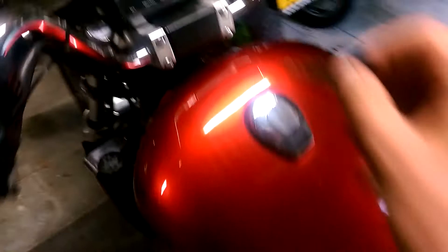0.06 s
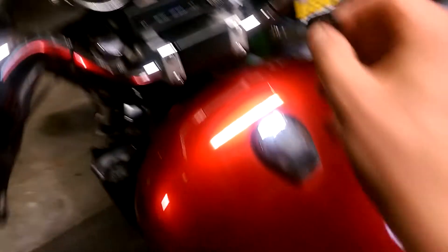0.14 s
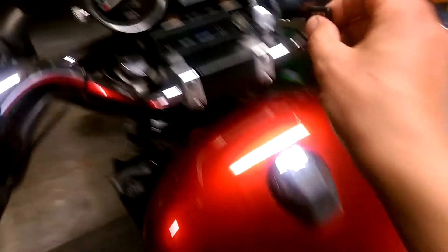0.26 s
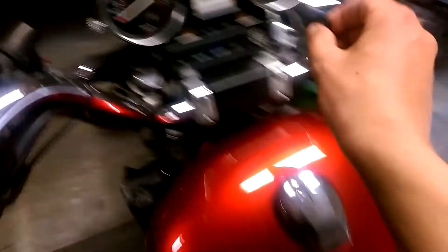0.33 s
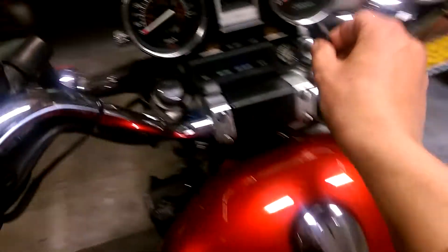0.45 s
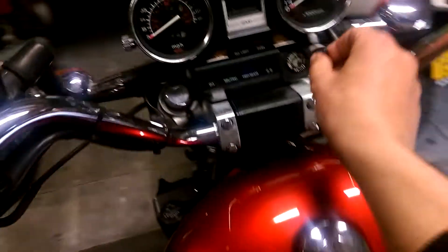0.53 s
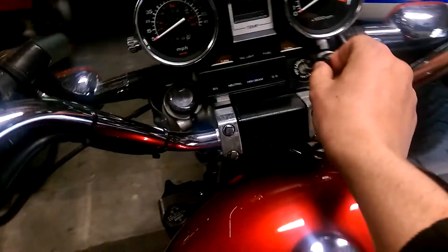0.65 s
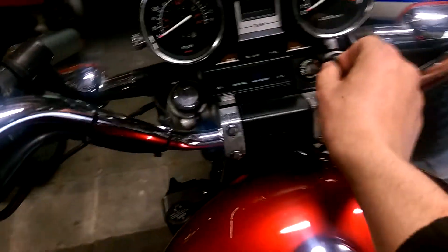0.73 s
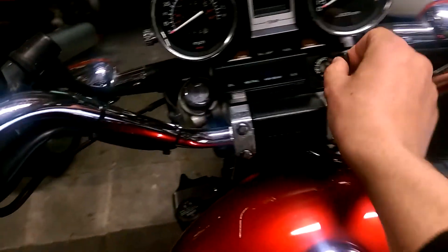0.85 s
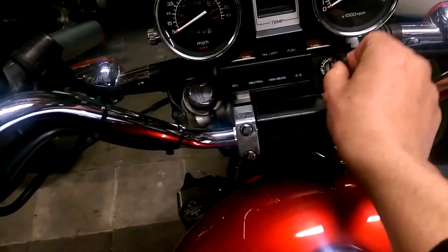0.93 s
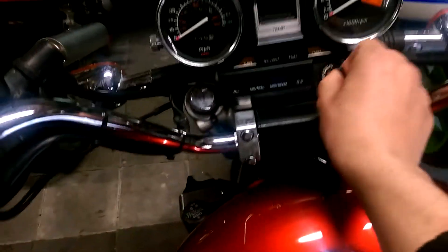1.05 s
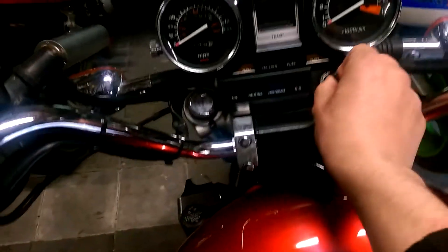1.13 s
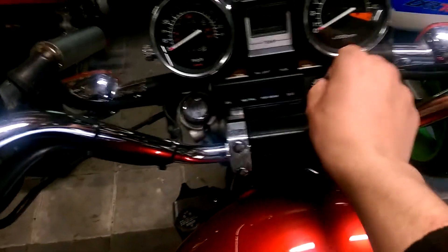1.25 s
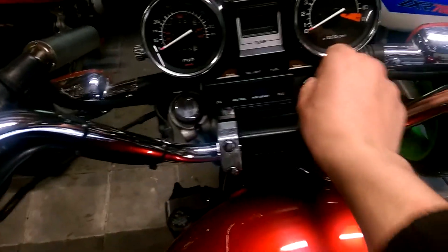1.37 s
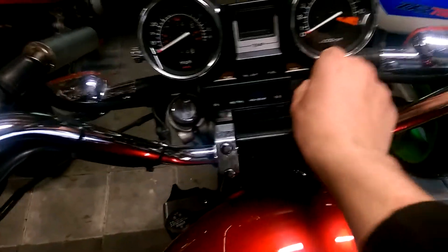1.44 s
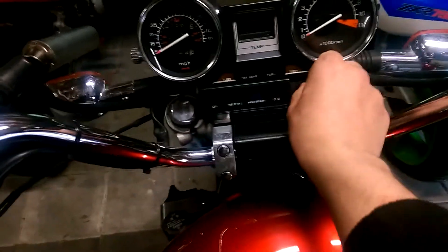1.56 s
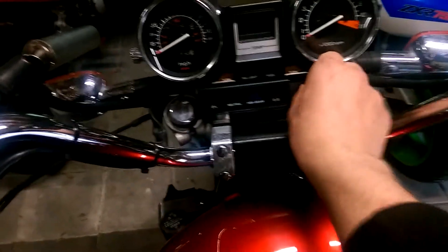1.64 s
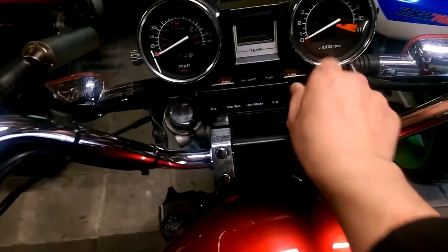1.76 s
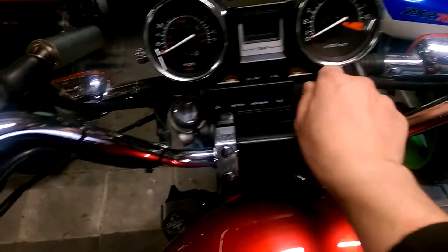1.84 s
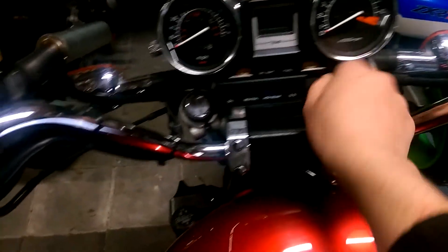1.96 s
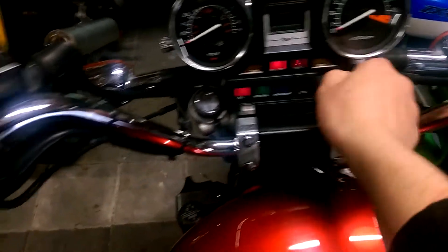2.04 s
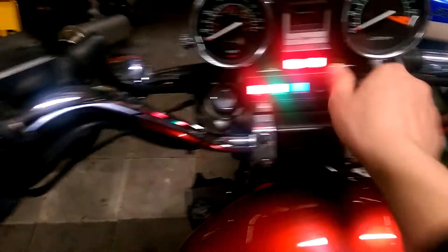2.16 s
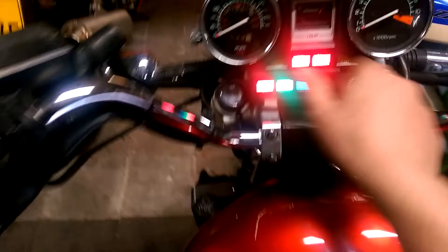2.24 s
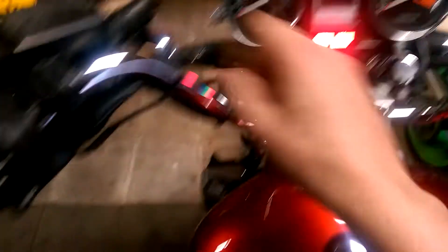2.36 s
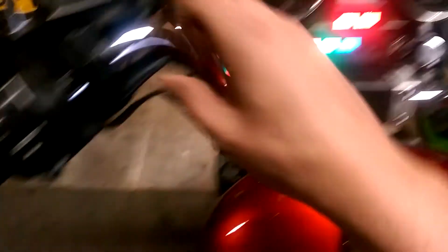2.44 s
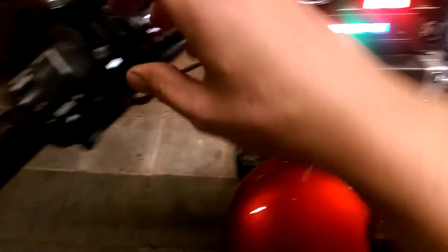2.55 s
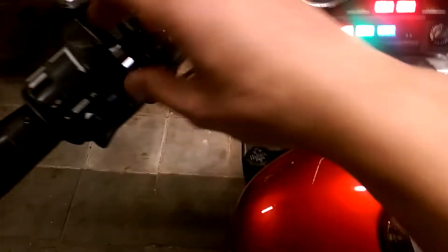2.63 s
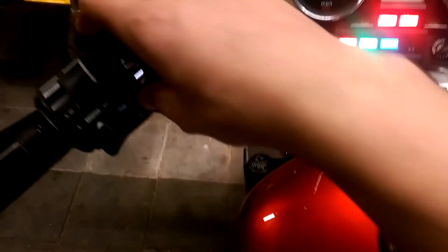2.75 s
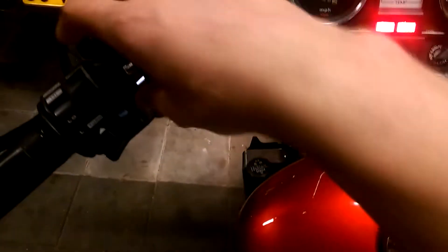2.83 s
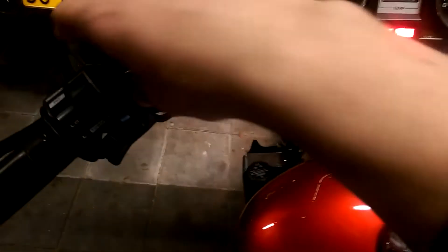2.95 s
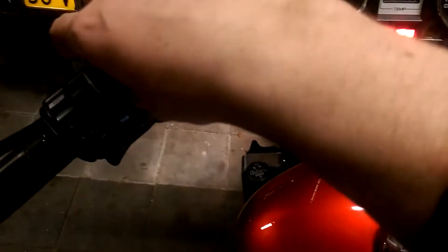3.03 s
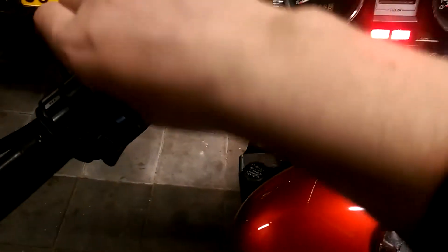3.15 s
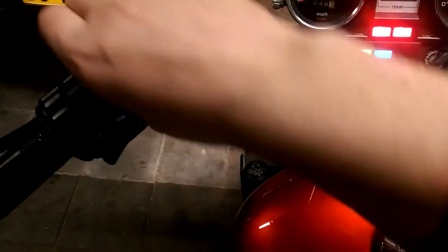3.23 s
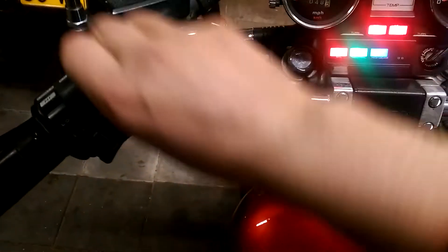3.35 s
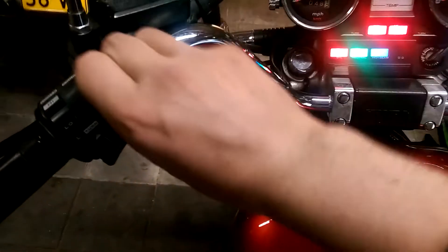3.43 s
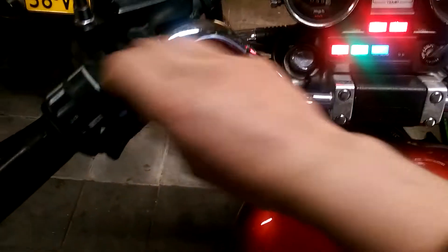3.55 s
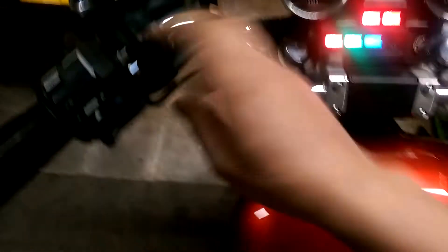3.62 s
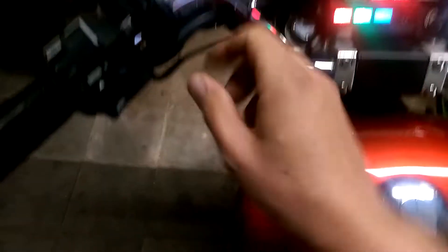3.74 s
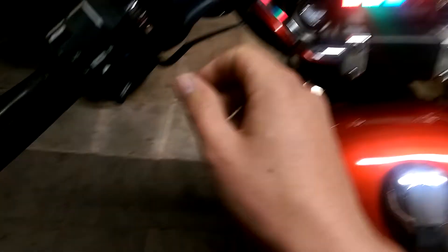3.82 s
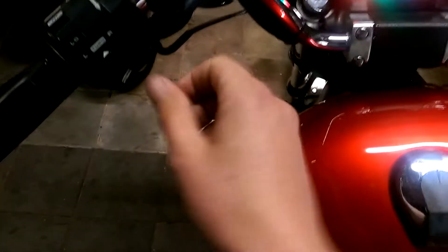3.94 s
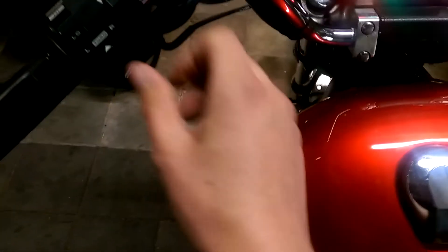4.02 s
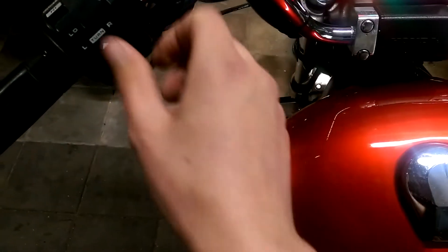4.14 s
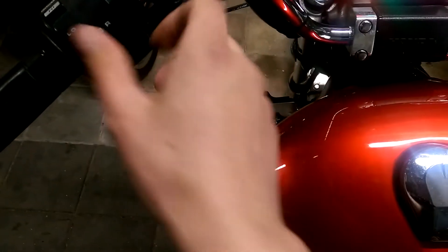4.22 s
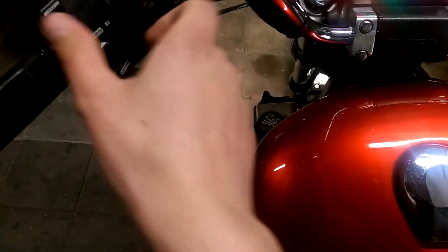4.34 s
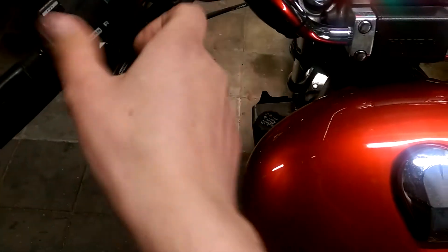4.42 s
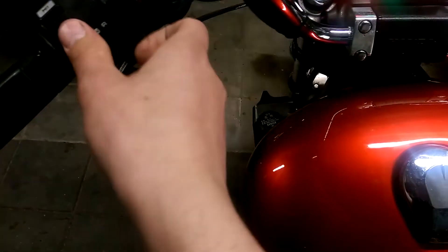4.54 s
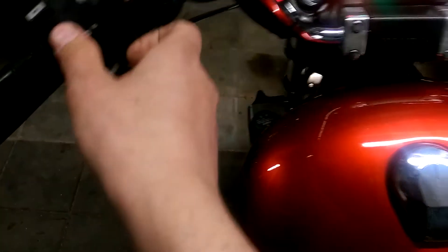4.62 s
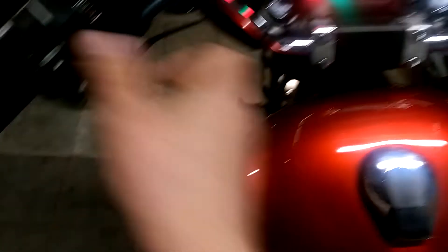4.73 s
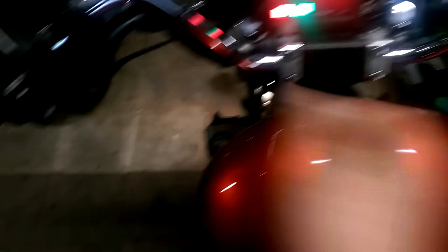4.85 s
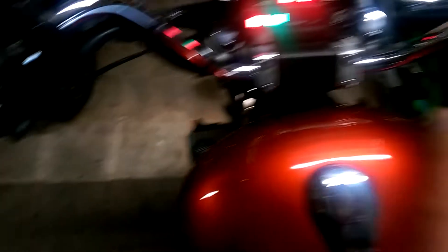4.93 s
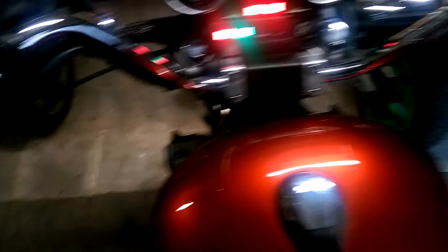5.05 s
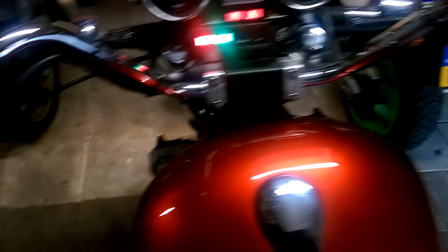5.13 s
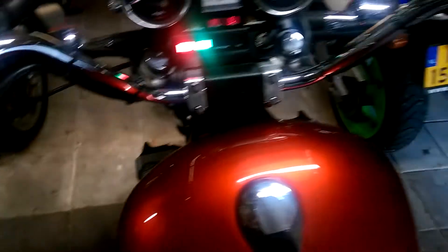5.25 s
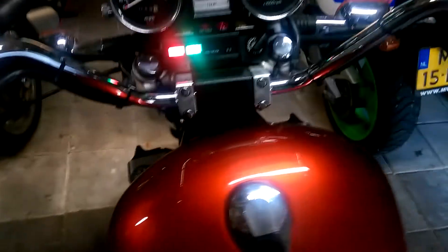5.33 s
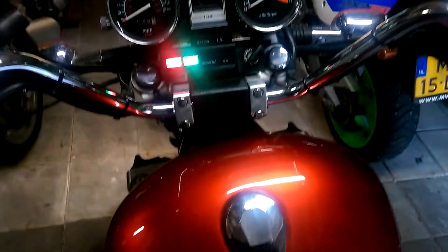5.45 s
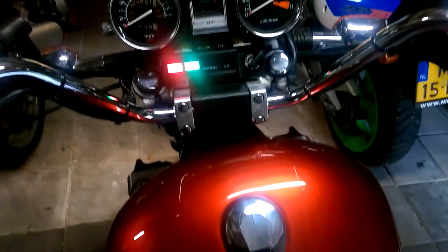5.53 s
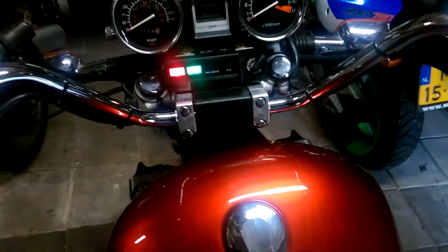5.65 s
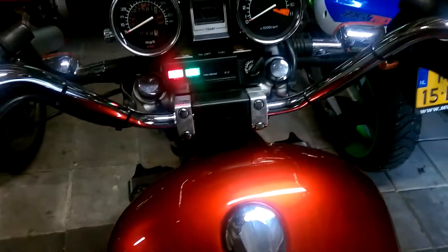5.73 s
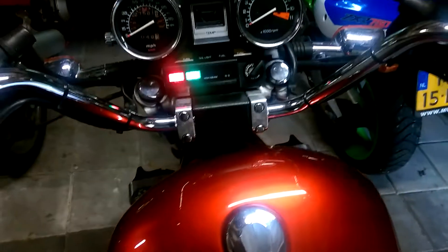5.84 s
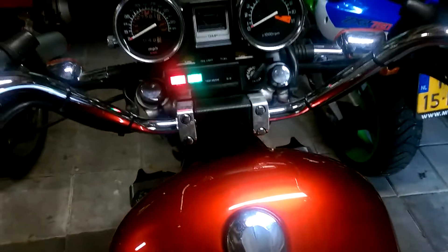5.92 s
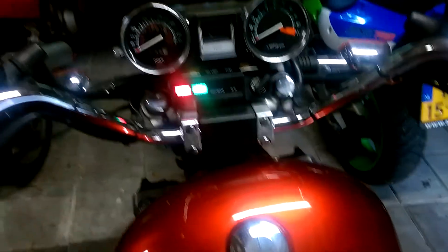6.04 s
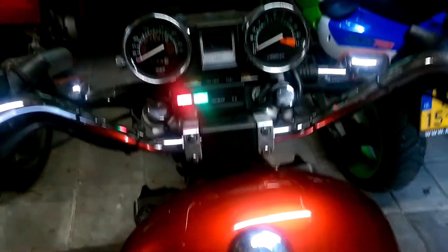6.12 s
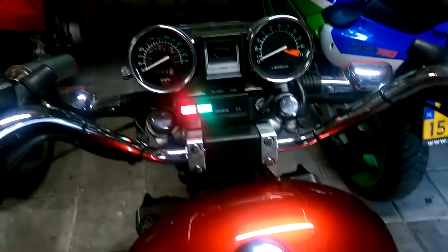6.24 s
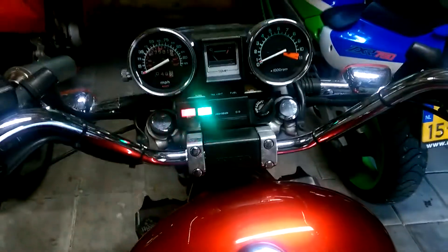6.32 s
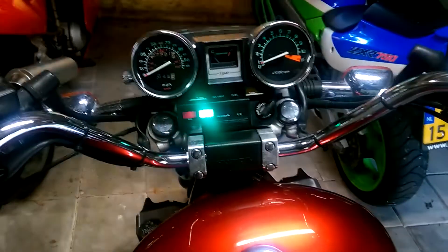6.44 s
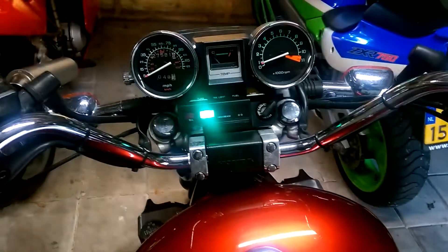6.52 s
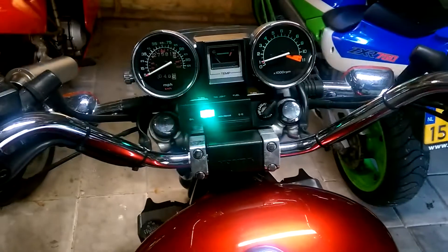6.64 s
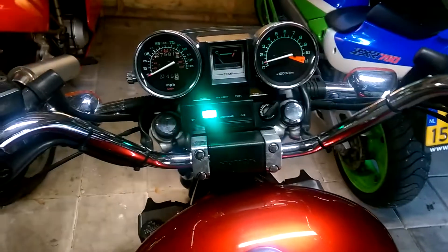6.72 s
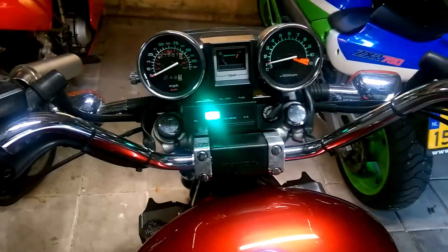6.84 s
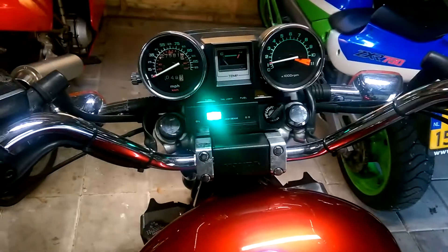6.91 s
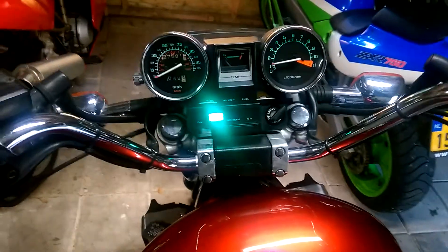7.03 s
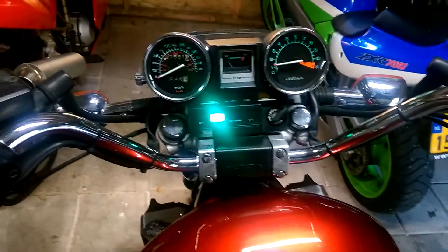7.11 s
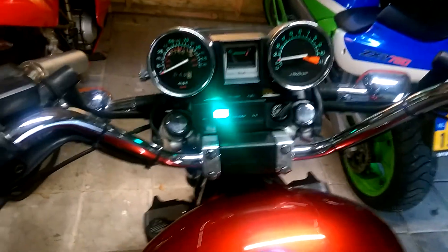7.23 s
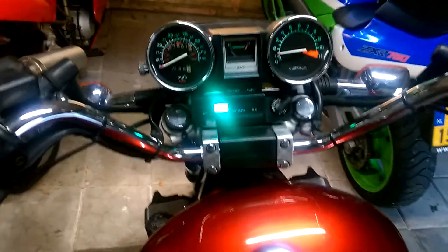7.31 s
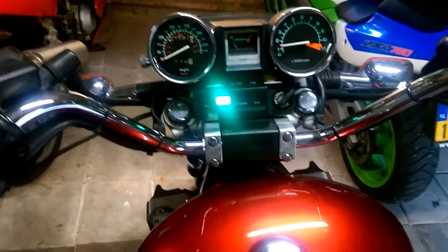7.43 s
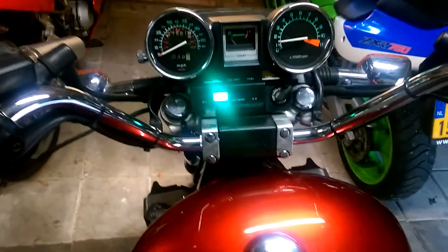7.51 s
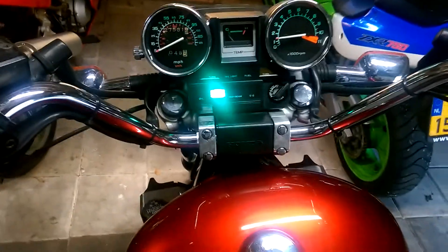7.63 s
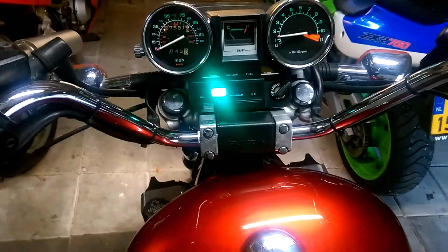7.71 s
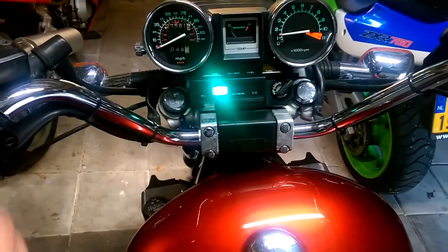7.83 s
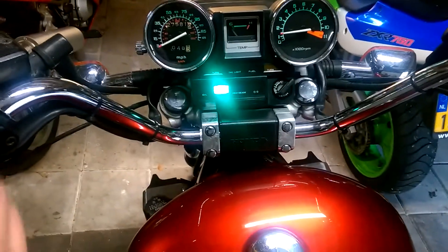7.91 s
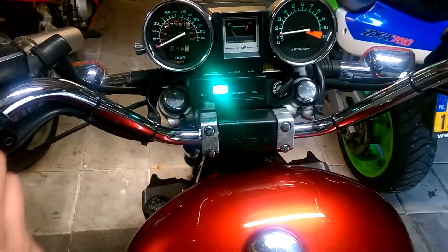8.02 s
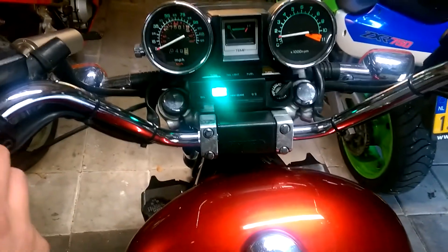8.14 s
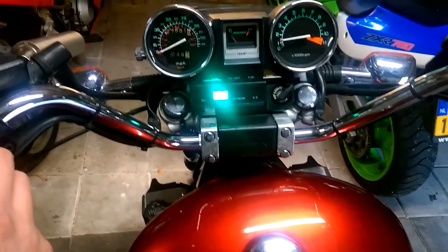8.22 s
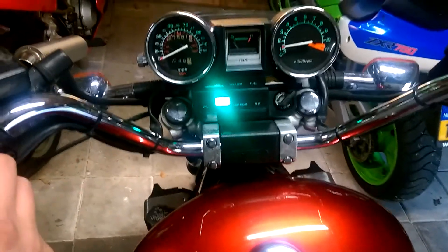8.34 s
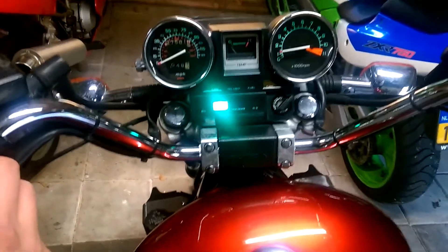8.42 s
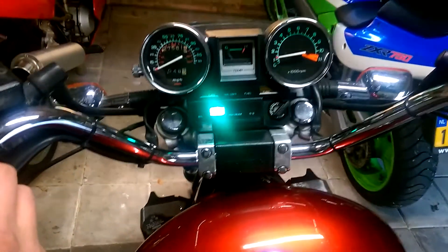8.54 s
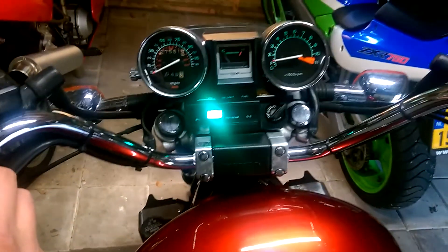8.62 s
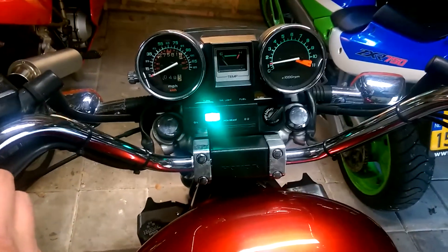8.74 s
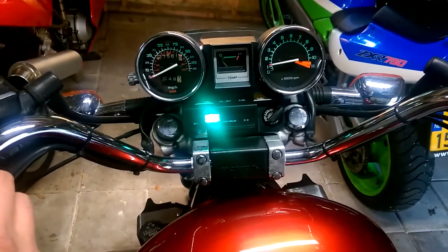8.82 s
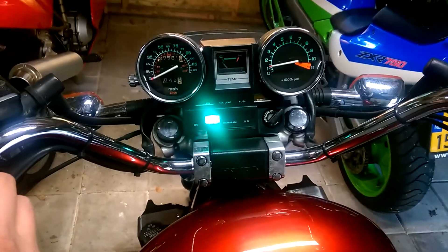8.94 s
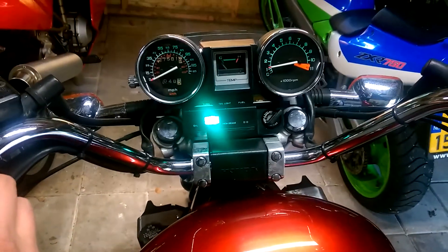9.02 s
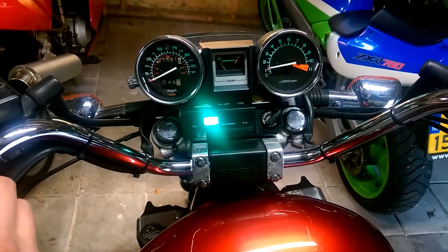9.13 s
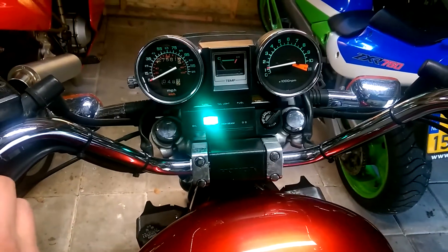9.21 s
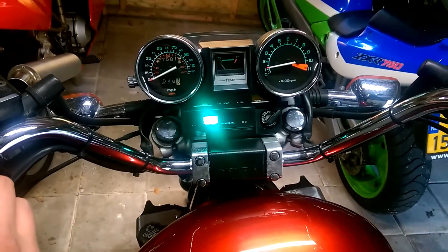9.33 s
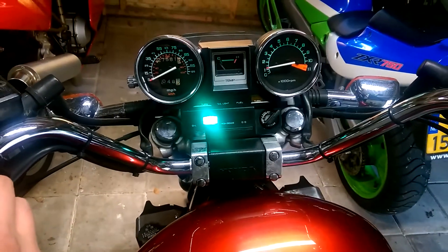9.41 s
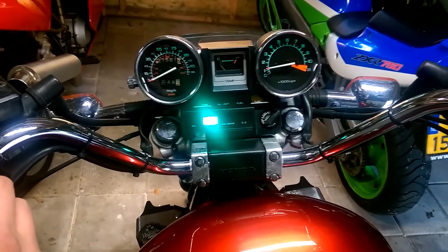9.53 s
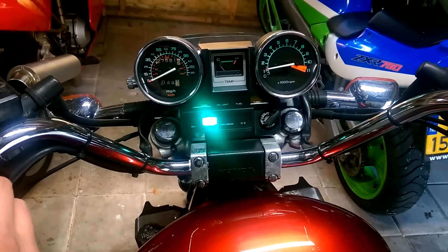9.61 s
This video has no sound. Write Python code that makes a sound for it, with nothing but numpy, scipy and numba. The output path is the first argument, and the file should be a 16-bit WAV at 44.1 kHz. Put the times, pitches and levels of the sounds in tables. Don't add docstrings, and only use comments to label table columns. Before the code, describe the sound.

Faint low hum and air in a garage. Small metallic scrapes and knocks of a key come first, slightly to the right, then a sharp ignition click, sparse switch clicks and a loud snap. The starter button clicks, a harsh geared grind sings for under a second, uneven low thumps overlap it, and the engine settles into a soft, throaty idle with a thin bracket buzz. Close stereo microphones at the rider's position.

```python
import sys
import numpy as np
from scipy import signal
from scipy.fft import rfft, irfft, next_fast_len
from scipy.io import wavfile
from scipy.ndimage import uniform_filter1d
from numba import njit

SR = 44100
rng = np.random.default_rng(int(sys.argv[2]) if len(sys.argv) > 2 else 0)


def waveform_to_disk(signal):
    frames = np.transpose(np.atleast_2d(signal))
    scaled = np.clip(frames, -1, 1) * 32767
    samples = np.round(scaled).astype(np.int16)
    wavfile.write(sys.argv[1], SR, samples)


def invert_db(level):
    return 10 ** (np.asarray(level, dtype=float) / 20)


N = 426447
TIME = np.arange(N) / SR

PRESS_S, MESH_S, STOP_S = 5.622, 5.66, 6.62
LOOSE_DB, GRIND_DB = -31, -22.5
SETTLES_S = 6.575
IDLE_CYCLES = 9.33


def level(x, db=0):
    return x * invert_db(db) / np.sqrt(np.mean(x ** 2))


def curves(table):
    s, *columns = np.transpose(table)
    return [np.interp(TIME, s, c) for c in columns]


def gate(start_s, stop_s, fade=0.017):
    return np.clip(np.minimum(TIME - start_s, stop_s + fade - TIME) / fade, 0, 1)


def swell(s, rise_s, fall_s):
    return np.exp(np.minimum((TIME - s) / rise_s, (s - TIME) / fall_s))


def on_log(table, hz):
    points = np.array(table)
    return np.interp(np.log(hz + 1), np.log(points[:, 0] + 1), points[:, 1])


def colour(x, table, share=1):
    count = x.shape[-1]
    size = next_fast_len(count + 8192)
    gain = invert_db(share * on_log(table, np.fft.rfftfreq(size, 1 / SR)))
    return irfft(rfft(x, size) * gain, size)[..., :count]


@njit
def ring(x, hz, width):
    y, b, l = np.empty(len(x)), 0., 0.
    for i in range(len(x)):
        g, k = np.tan(np.pi * hz[i] / SR), width / hz[i]
        v = (b + g * (x[i] - l)) / (1 + g * (g + k))
        b, l, y[i] = 2 * v - b, l + 2 * g * v, k * v
    return y


def body(x, modes):
    out = 0
    for k, (hz, width, db) in enumerate(modes):
        centre = np.full(len(x), 1. * hz)
        out = out + (-1) ** k * invert_db(db) * ring(x + 1e-18, centre, 1. * width)
    return out


def walk(rate):
    k = int(SR / rate)
    steps = np.repeat(rng.standard_normal(N // k + 1), k)
    return 1.3 * uniform_filter1d(uniform_filter1d(steps, k), k)[:N]


def pulses(turns, place, jitter, scatter_db):
    chance = rng.standard_normal((int(turns[-1]) + 1, 2)).T
    due = np.arange(len(chance[0])) + place + jitter * chance[0]
    keep = (due > turns[0]) & (due < turns[-1])
    at = np.interp(due[keep], turns, np.arange(N))
    return np.bincount(at.astype(int), invert_db(scatter_db * chance[1][keep]), N)


def late_left(x, count):
    return np.array([np.r_[np.zeros(count), x[:-count]], x])


def garage(x):
    # f/Hz, T60/s
    decay_times = [(100, 1), (1000, 0.42), (3000, 0.56), (12000, 0.62)]
    t = np.arange(int(.6 * SR)) / SR
    tail = 0
    for hz in 125 * 2. ** np.arange(7):
        noise = np.array([body(row, [(hz, hz * .7, 0)]) for row in rng.standard_normal((2, len(t)))])
        tail = tail + level(noise) * np.sqrt(hz) * invert_db(-60 * t / on_log(decay_times, hz))
    tail = tail * np.clip(t / 0.0007, 0, 1)
    return signal.fftconvolve(x[None], tail / np.sqrt(np.sum(tail ** 2) / 2), axes=1)[:, :N]


def quiet():
    # f/Hz, level per Hz/dB
    air_spectrum = [(25, -12), (60, -16), (139, -1), (170, -11), (300, -15), (600, -15), (960, -12),
                    (1900, -18), (4000, -29), (8000, -34), (16000, -39)]
    hum_db, air_db = -55, -59
    hum = rng.standard_normal(N)
    for mode in [(63.7, 22.0, 0), (63.5, 29.0, 0), (63.4, 33, 0)]:
        hum = body(hum, [mode])
    air = colour(rng.standard_normal((2, N)), air_spectrum) * invert_db(0.11 * walk(11.0))
    phase = 2 * np.pi * np.cumsum(63.9 + 1.5 * walk(10)) / SR
    drone = np.sin(phase) * invert_db(1.8 * walk(13))
    return level(hum, hum_db - 5) + level(drone, hum_db - 2) + level(air, air_db + 1.5)


def answers():
    # t/s, f/Hz, width/Hz, level/dB, decay/s
    responses = [(1.4, 710, 90, -63, .04), (1.31, 360, 160, -51.5, 0.084), (1.2, 700, 70, -51, .03),
                 (1.47, 700, 60, -56, .015), (1.575, 620, 160, -55, .015), (1.785, 350, 230, -52, .06),
                 (2.1, 700, 150, -48, .05), (1.115, 2050, 200, -56, 0.042), (.98, 2000, 250, -54, .03),
                 (1.115, 680, 90, -60, .015), (1.55, 1150, 300, -54, .04), (3.335, 900, 500, -57, .03)]
    noise = rng.standard_normal(N)
    rings = 0
    for s, hz, width, db, dies_s in responses:
        mode = [(hz, width, 0)]
        rings = rings + level(body(body(noise, mode), mode), db) * swell(s, 0.0032, dies_s)
    return late_left(rings, count=7)


def hands():
    # t/s, peak level/dB, f/Hz, treble level/dB
    key = [
        (0.3311, -28, 2090, -30),
        (0.7858, -39, 1910, -12),
        (0.9737, -35, 1860, -40),
        (1.1085, -29, 1980, -33),
        (1.2394, -34, 1560, -40),
    ]
    lock = [
        (1.3022, -14.5, 2830, -45),
        (1.4085, -37, 1340, 2),
        (1.456, -40, 1880, -24),
        (1.5434, -28, 1800, -24),
        (1.5694, -33.5, 1880, 0.5),
        (1.751, -33, 1860, -32),
        (1.7738, -29, 710, -18),
        (3.1877, -37, 3530, -12),
        (3.328, -38.5, 2130, -38),
    ]
    turn = [
        (2.0827, -39, 3060, -21),
        (2.0938, -11, 2440, -2),
    ]
    switch = [
        (2.264, -29.5, 4350, -12),
        (2.272, -40, 2240, 4),
        (3.1658, -29, 2220, -26),
        (4.5428, -6, 1045, 5),
        (5.599, -49, 2980, 9),
        (5.629, -17.5, 1210, -9),
        (5.6595, -9, 2500, -14),
    ]
    # thud level/dB, share the walls hear/dB, broad crack level/dB
    parts = [(-38, -6, -14), (-35, -6, -4), (-44, -6.5, -2), (-55, -14, -3)]
    # t/s of the peak, level/dB, rise/s, decay/s
    scrapes = [
        (.29, -48, .006, .035),
        (.792, -53, .004, .04),
        (.865, -49, .015, .04),
        (.9, -53, .02, .03),
        (1.046, -52, .012, .02),
        (1.112, -58, .003, .02),
        (3.35, -57, .01, .04),
    ]
    near, far = np.zeros(N), np.zeros(N)
    t = np.arange(4096) / SR
    small = signal.butter(2, 680, "high", fs=SR, output="sos")

    def strike(x, part, thud_db):
        return signal.sosfilt(small, body(x, part)) + body(x, [(465, 900, thud_db + 16.5)])

    clicks = [(*row, *kind) for rows, kind in zip((key, lock, turn, switch), parts) for row in rows]
    noises = rng.standard_normal((len(clicks), len(t)))
    for (s, db, hz, treble_db, thud_db, tail_db, broad_db), noise in zip(clicks, noises):
        decay_s = .002 + .00005 * max(-db - 14, 0)
        crack = noise * np.clip(t / .0006, 0, 1) * np.exp(-t / decay_s)
        part = [(hz, 0.34 * hz, 2.5), (2400, 2500, broad_db), (9000, 9000, treble_db - 15.0)]
        hit = strike(crack, part, thud_db)
        hit = hit / np.max(np.abs(hit)) * invert_db(db)
        spread = strike(1. * (t == 0), part, thud_db)
        spread = spread * np.sqrt(np.sum(hit ** 2) / np.sum(spread ** 2))
        i = int(s * SR)
        near[i:i + len(t)] += hit
        far[i:i + len(t)] += spread * invert_db(min(tail_db, 0))
    grit = rng.standard_normal(N) * invert_db(3 * walk(300))
    grit = level(body(grit, [(1920, 300, 3.5), (2920, 1400, 2), (6700, 19000, -13)]))
    grit = grit * sum(invert_db(db) * swell(s, rise_s, fall_s) for s, db, rise_s, fall_s in scrapes)
    return late_left(near + 1.25 * grit, count=7) + garage(far + 0.35 * grit)


def heaves(size):
    # t/s, grind level/dB, hiss level/dB, chuff level/dB, decay/s
    efforts = [
        (5.63, -40, -36, -53, 0.015),
        (5.695, -18, -34.5, -56, 0.035),
        (5.794, -18, -34, -56, 0.013),
        (5.86, -19, -30, -47, 0.054),
        (5.91, -18, -32, -54, 0.024),
        (6.039, -20, -32, -44, 0.04),
        (6.135, -36, -53, -42, 0.03),
        (6.29, -17.5, -31.5, -38, 0.063),
        (6.59, -32, -47, -60, 0.056),
    ]
    return sum((invert_db(row[size]) * swell(row[0], 0.016, row[-1])) ** 2 for row in efforts)


def pumping():
    # f/Hz, width/Hz, level/dB
    rumble_modes = [(49.6, 24, 0.5), (78.6, 32, -1), (200, 52, -10)]
    gas = body(rng.standard_normal(N), [(55, 32, 5.0), (130, 60, 2.0), (219, 87, 0.5), (430, 480, -4.5)])
    chuff = level(gas) * np.sqrt(invert_db(-49) ** 2 + heaves(size=3)) * gate(PRESS_S, STOP_S, fade=0.023)
    rumble = level(body(rng.standard_normal(N), rumble_modes), -30.5) * gate(6.125, SETTLES_S, fade=0.02)
    return rumble + chuff


def singing():
    # t/s of the peak, f/Hz, level/dB, decay/s, glide/(Hz/s)
    sung = [(5.645, 1223, -29, .02, 0), (5.685, 1302, -19.5, 0.041, -100), (5.7, 1691, -24, 0.031, 0),
            (5.695, 2531, -27, .035, -1500), (5.69, 1976, -26, 0.033, 0), (5.79, 940, -28, 0.026, 0),
            (6.3, 1935, -25, .025, 0), (5.79, 1700, -27, .025, -3), (5.855, 1214, -23.5, 0.038, -600),
            (5.885, 2415, -24, .03, -800), (5.89, 3544, -33, .03, 0), (5.94, 1208, -26, .03, 0.5),
            (8, 1700, -32, .035, -3), (5.985, 1017, -26, .03, -2), (5.995, 2600, -29, .03, -2),
            (6.035, 1211, -22, .04, 0.5), (6.035, 2482, -21, .03, -500), (6.095, 1300, -23.5, .04, 299.5),
            (6.09, 1950, -29, .04, -2), (6.145, 1150, -23, .045, -300), (6.2, 1125, -28, .045, 0),
            (6.2, 2300, -34, .04, 0), (6.3, 1600, -24.5, .03, -1500), (6.34, 1300, -22, 0.049, -300),
            (5.7, 2660, -23.5, .04, 1200), (6.39, 2835, -32, 0.039, 599.5), (6.44, 1234, -31, .04, 0)]
    out, wobble, rough = np.zeros(N), walk(150), walk(90)
    on = TIME > PRESS_S
    for k, (s, hz, db, dies_s, glide) in enumerate(sung):
        shift = 9000 * k
        pitch = (hz + glide * (TIME - s)) * (1 + .012 * np.roll(wobble, shift))
        loudness = invert_db(db + 3.6 * np.roll(rough, shift)) * swell(s, 0.021, dies_s)
        out[on] += loudness[on] * np.sin(2 * np.pi * np.cumsum(pitch[on]) / SR)
    out = out * np.where(TIME < MESH_S, invert_db(LOOSE_DB - GRIND_DB), 1)
    return 1.18 * late_left(out, count=5) + 0.6 * garage(out)


def starter():
    # f/Hz, width/Hz, level/dB
    housing = [(880, 90, -1), (1010, 76, 3.5), (1680, 160, -9), (3560, 260, -7), (2780, 260, -7.5),
               (4280, 1130, -14)]
    # f/Hz, width/Hz, level/dB, share of the bend
    bent_modes = [(1180, 100, 9, 1.0), (1950, 170, 5, -0.1), (2460, 200, 2, 0.46)]
    # t/s, change/10 %
    strain = [(5.62, 0.39), (5.71, 1), (5.79, -1.3), (5.86, 0.33), (5.92, -0.49), (6.04, 0.088),
              (6.2, -0.7), (6.3, 0.82), (6.62, 0.72)]
    let_go_s, run_down_db_per_s = 6.083, 61
    tooth_hz, slide_db = 441.5, -41
    on = gate(PRESS_S, STOP_S)
    run_down_db = run_down_db_per_s * np.maximum(TIME - let_go_s, 0)
    steady_db = np.where(TIME < MESH_S, LOOSE_DB, GRIND_DB) - run_down_db
    meshed = np.where(TIME < MESH_S, invert_db(LOOSE_DB - GRIND_DB), 1)
    force = np.sqrt(invert_db(steady_db) ** 2 + meshed ** 2 * heaves(size=1)) * on
    rub = np.sqrt(invert_db(slide_db) ** 2 + heaves(size=2)) * on

    teeth = level(pulses(TIME * tooth_hz, .5, jitter=.2, scatter_db=4)) + .7 * rng.standard_normal(N)
    bend = curves(strain)[0] / 10
    rings = [invert_db(db + 1.94 * walk(22)) * ring(teeth, hz * (1 + share * bend), 1. * width)
             for hz, width, db, share in bent_modes]
    grind = body(teeth * invert_db(3.4 * walk(30)), housing) + rings[0] - rings[1] + rings[2]
    grind = signal.sosfilt(signal.butter(4, 730, "high", fs=SR, output="sos"), grind)
    grind = level(grind) * force
    slide = colour(rng.standard_normal((2, N)), [(300, -17.0), (3000, -3.0), (5000, -2.0), (9000, -2.0),
                                                 (13500, -12.0), (16000, -30)])
    hiss = level(slide, 0.43) * invert_db(2.1 * walk(50)) * rub
    return late_left(grind, count=13) + 0.94 * garage(grind) + hiss


def bracket():
    # start t/s, end t/s, level/dB
    spells = [
        (7.5, 7.6, -50),
        (7.75, 8.07, -45),
        (8.14, 8.32, -48),
        (8.47, 8.63, -46),
        (8.95, 9.1, -50),
    ]
    # f/Hz, width/Hz, level/dB
    bracket_mode = [(3190, 60, 0)]
    ring_on = sum(invert_db(db) * gate(start_s, stop_s, fade=0.02) for start_s, stop_s, db in spells)
    grit = rng.standard_normal(N) * invert_db(3 * walk(40))
    buzz = level(body(body(grit, bracket_mode), bracket_mode)) * ring_on
    return buzz + garage(buzz)


def mechanics(turns, speed):
    # f/Hz, width/Hz, level/dB, rise above idle/(dB per cycle/s)
    cover_modes = [(548, 22, 2.5, 0.2), (847, 38, 0.5, 1.6), (987, 22, 0, 2.4), (1028, 20, 0, 2.2),
                   (1910, 90, 0, -0.8), (2605, 136, -3, -0.9), (3189, 70, -5, -.5)]
    # f/Hz, level per Hz/dB
    intake_spectrum = [(160, -31), (280, -11), (373, -9.5), (540, -4.5), (607, -5.5), (1010, -10.5),
                       (1130, -11), (1640, -11.5), (1940, -10), (2220, -9), (2620, -11), (4810, -18.5),
                       (13400, -33), (15600, -43.5)]
    ticks = pulses(4 * turns, .3, jitter=.12, scatter_db=3.5)
    rattle = rng.standard_normal(N) * invert_db(1.5 * walk(60))
    knock = level(ticks, -4.5) + level(rattle)
    covers = 0
    for *mode, rise_db in cover_modes:
        drift_db = 0.8 * walk(4) + 2.2 * walk(25) + rise_db * (speed - IDLE_CYCLES)
        covers = covers + body(knock * invert_db(drift_db), [mode])
    covers = level(covers, 1.44)
    stroke_db = 0.24 * np.cos(2 * np.pi * (turns - .2)) + 1.8 * np.cos(4 * np.pi * (turns - .3))
    hiss = level(colour(rng.standard_normal((2, N)), intake_spectrum), 8.04)
    hiss = hiss * invert_db(stroke_db + 0.98 * walk(40))
    return 0.74 * covers + garage(covers) + hiss


def exhaust(turns, speed_now):
    firing = [0, .1112, .4772, .5855]
    # usual blow level per sample/dB, share of the burn, share of the favour
    pots = [(48.9, .42, .84), (51.8, .46, -.17), (46.7, .73, -.46), (46.5, .27, .24)]
    # t/s, burn level/dB, favour to the first cylinder/dB
    burn = [(6.57, 3.5, 1), (6.73, -1.5, -5.5), (6.89, -7, 6.5), (7.05, -1, 3), (7.37, -3.5, 4),
            (7.53, -1, -1.5), (7.85, -3, -4), (8.17, 3, -2.7), (8.49, 3.5, -4), (8.65, 3.5, -1.5),
            (9.45, 2, 3), (9.67, 5.5, -3)]
    # t/s, blow level per sample/dB, cylinder 0-3
    stumbles = [(6.114, 27.9, 2), (6.1329, 35.4, 2), (6.1409, 38.1, 0), (6.2008, 38.5, 3),
                (6.2227, 28.4, 3), (6.2367, 36.4, 0), (6.3215, 43.3, 0), (6.3464, 32.9, 2),
                (6.3724, 46.1, 2), (6.3933, 35.3, 3), (6.4063, 43.1, 1), (6.4263, 38.2, 0),
                (6.4562, 45.5, 0), (6.4662, 31.5, 3), (6.4761, 34.2, 2), (6.4941, 42.1, 2),
                (6.5071, 31.0, 2), (6.521, 45.4, 0), (6.556, 41.2, 0), (6.5689, 48.3, 1)]
    # f/Hz, width/Hz, signed shares fed in by cylinders 1-4
    pipe_modes = [(47.4, 7.1, 0.01, -0.02, 0.1, 0.49), (64.2, 7.6, -0.0, 0.2, 0.07, 0.27),
                  (83.2, 9.6, 0.1, -0.13, -0.07, -0.1), (97.9, 28.0, -0.06, 0.07, -0.15, 0.11),
                  (114.5, 10.0, 0.23, 0.72, 0.73, 1.0), (121.0, 7.2, 0.29, -0.39, -0.26, -0.45),
                  (134.8, 8.7, -1.0, -1.0, -1.0, -0.93), (144.0, 11.2, 0.61, 0.49, 0.33, 0.13),
                  (157.8, 7.2, -0.11, 0.11, 0.38, -0.08), (177.6, 40.0, 0.0, -0.0, 0.0, 0.0),
                  (196.8, 9.6, 0.08, -0.01, 0.02, 0.01), (213.1, 9.6, -0.14, -0.1, -0.1, -0.18),
                  (252.7, 12.0, 0.01, 0.0, 0.05, -0.01), (296.4, 18.0, 0.02, 0.02, 0.02, 0.03)]
    # f/Hz, width/Hz, level/dB
    puff_modes = [(101.4, 41, -4.5), (171.4, 23.7, -3.5), (205, 36, -10.5), (240.3, 28.7, -6),
                  (273, 67, -26.5)]
    out, beats = 0, 0
    burn_db, favour_db = curves(burn)
    for k, (place, (usual_db, burns, favoured)) in enumerate(zip(firing, pots)):
        punch_db = usual_db + burns * burn_db + favoured * favour_db
        blows = pulses(turns, place, jitter=.0015, scatter_db=.7) * invert_db(punch_db) * (TIME > SETTLES_S)
        for s, db, pot in stumbles:
            blows[int(s * SR)] += invert_db(db) * (pot == k)
        out = out + sum(share[k] * body(blows, [(hz, width, 0)]) for hz, width, *share in pipe_modes)
        beats = beats + blows
    gas = signal.lfilter([1], [1, -np.exp(-1 / (0.1 * SR))], beats)
    puffs = gas * rng.standard_normal(N)
    lift = invert_db(2.2 * (speed_now - IDLE_CYCLES))
    out = out + body(out, [(159.8, 6.5, -3.0)])  + body(out, [(206, 20, -8.0)]) * lift
    out = out + level(body(puffs, puff_modes), -31)
    return signal.sosfilt(signal.butter(3, 330, fs=SR, output="sos"), out)


def engine():
    # t/s, four-stroke cycles a second
    crank = [(6.12, 9.447), (6.25, 8.194), (6.41, 7.704), (6.57, 9.588), (6.73, 10.262), (6.89, 11.153),
             (7.05, 11.557), (7.37, 11.556), (7.53, 10.527), (7.69, 10.909), (7.85, 10.373), (8.17, 9.287),
             (8.33, 9.359), (8.49, 9.631), (8.65, 9.239), (9.45, 9.278), (9.67, 9.826)]
    gear_from_s, oil_s = 6.27, 0.081
    speed = curves(crank)[0]
    turns = .3265 + np.cumsum(speed * (TIME > crank[0][0]) + 1e-9) / SR
    dry_db = 16 * swell(gear_from_s, oil_s, oil_s)
    gear_db = -40.5 + 0.88 * (speed - IDLE_CYCLES) + dry_db
    gear = mechanics(turns, speed) * invert_db(gear_db) * gate(gear_from_s, N, fade=0.32)
    return late_left(exhaust(turns, np.gradient(turns) * SR), count=5) + gear


def scene():
    background = quiet()
    handling = hands() + answers()
    starting = starter() + singing() + pumping()
    running = engine() + bracket()
    return background + handling + starting + running


def low_pass(x):
    return signal.sosfilt(signal.butter(12, 16540, fs=SR, output="sos"), x)


def record(dry):
    # f/Hz, level/dB
    apart = [(120, -13), (300, -6.5), (600, -7), (1100, -1.5), (3000, 1.9)]
    # f/Hz, left minus right/dB
    port_balance = [(60, -1), (110, 1), (200, 2.5), (380, 0), (700, 0.5), (1290, 2.5), (2380, 8), (4400, 1),
                    (8120, 5.5), (15000, 26.5)]
    mid = dry.mean(axis=0)
    side = colour((dry[0] - dry[1]) / 2, apart)
    left = colour(mid + side, port_balance, share=.5)
    right = colour(mid - side, port_balance, share=-.5)
    ports = np.array([left, right])
    ports = signal.sosfilt(signal.butter(3, 36, "high", fs=SR, output="sos"), ports)
    ports = signal.sosfilt(signal.ellip(8, .2, 40, 15900, fs=SR, output="sos"), ports)
    return low_pass(np.tanh(1.315 * ports) / 0.94)


dry = scene()
out = record(dry)
waveform_to_disk(out)
```